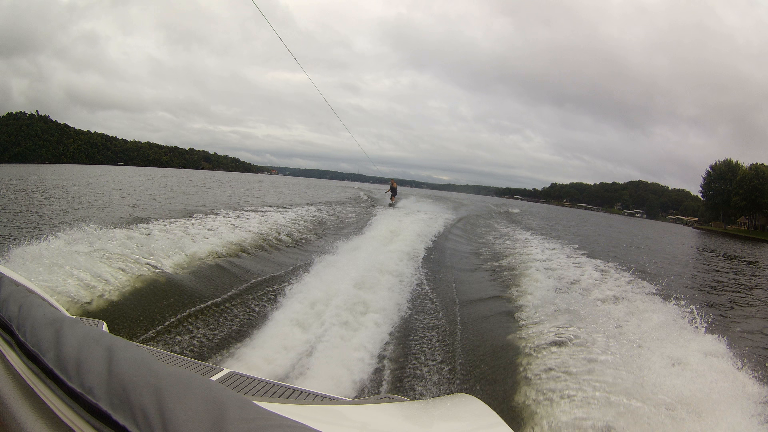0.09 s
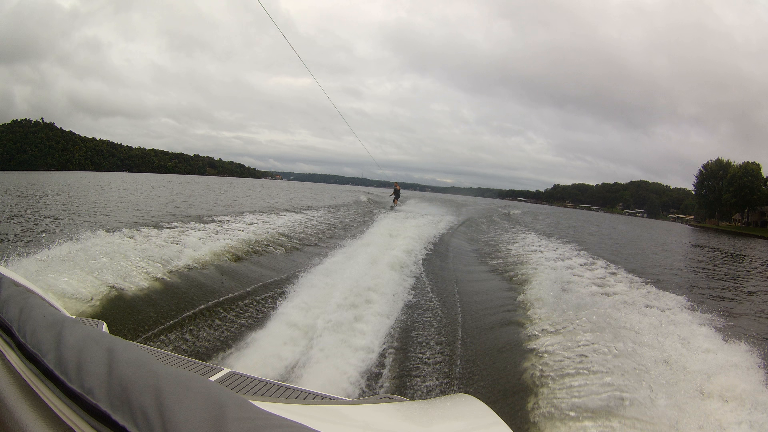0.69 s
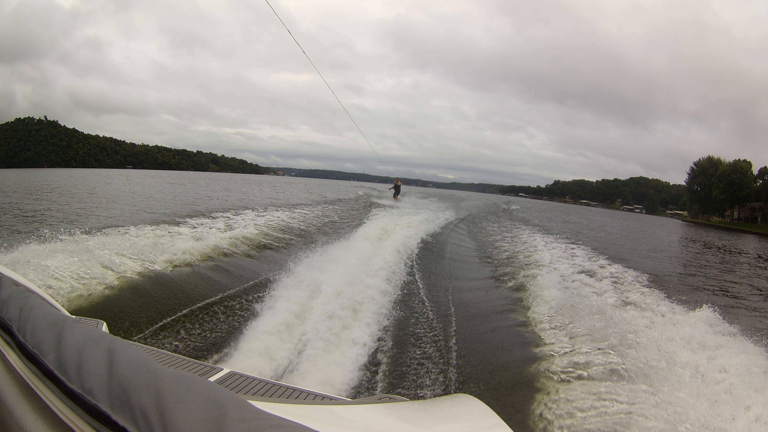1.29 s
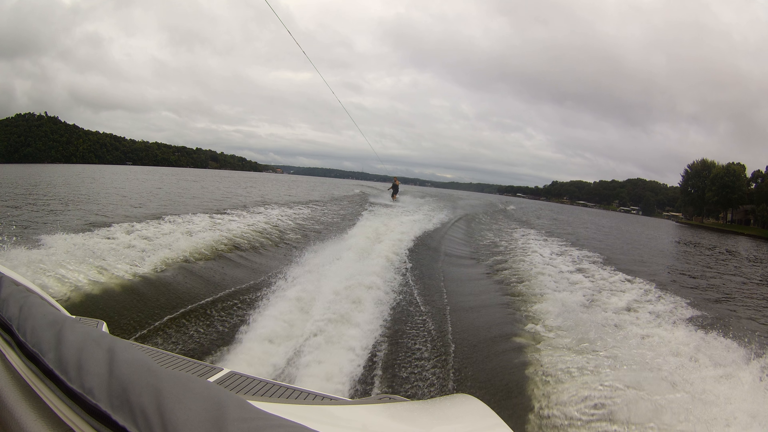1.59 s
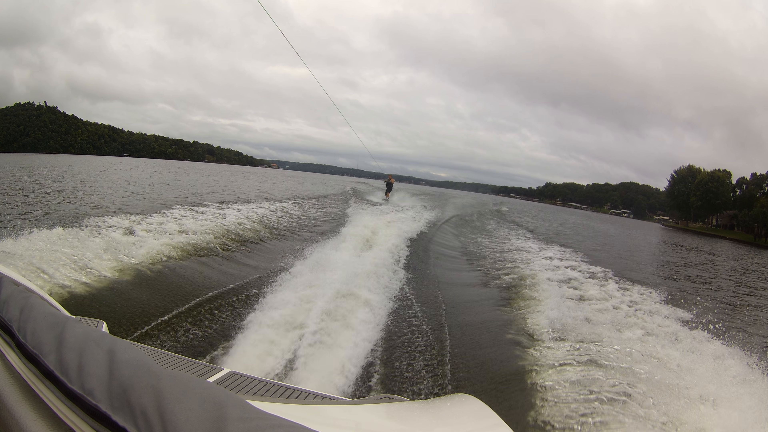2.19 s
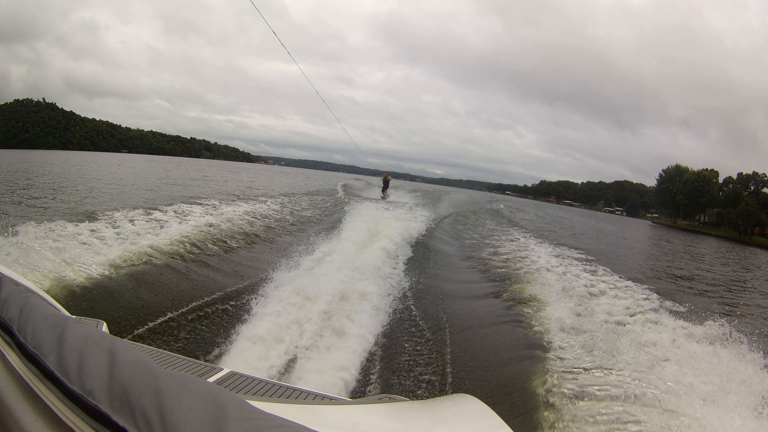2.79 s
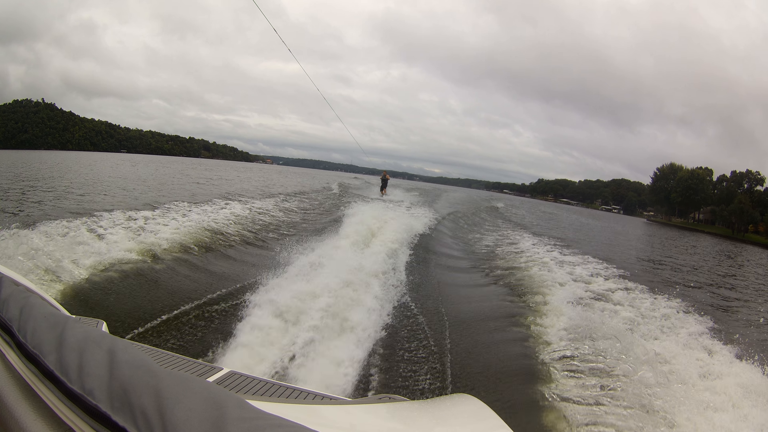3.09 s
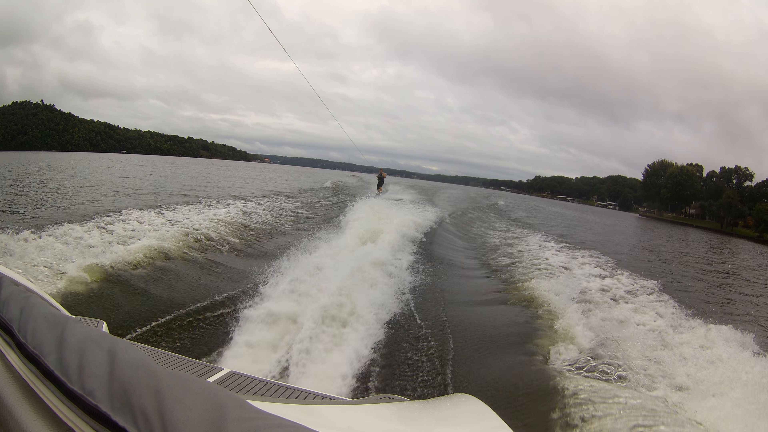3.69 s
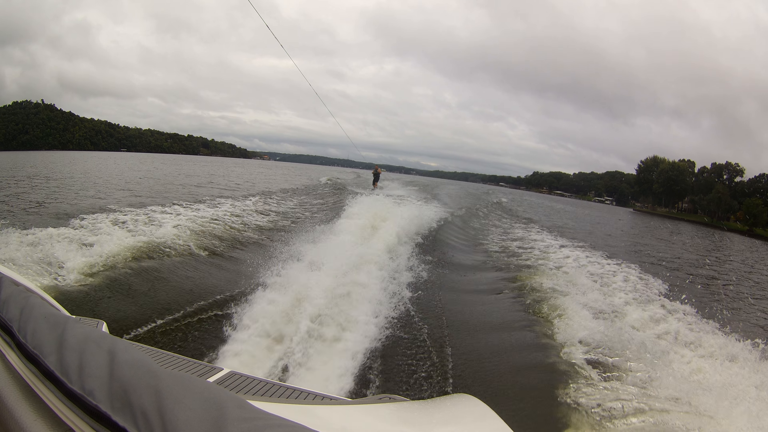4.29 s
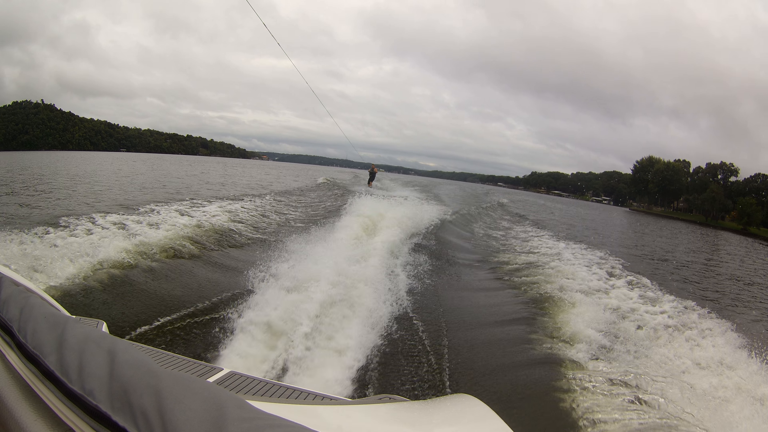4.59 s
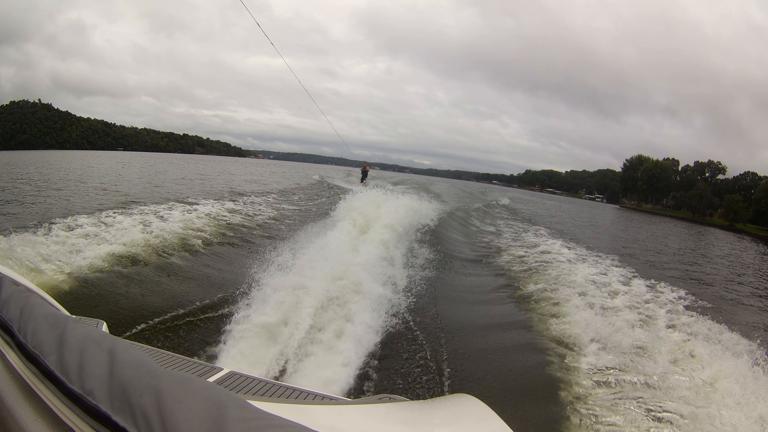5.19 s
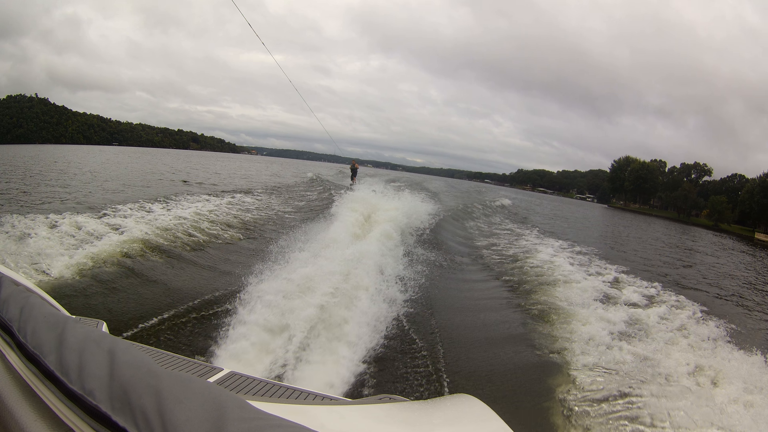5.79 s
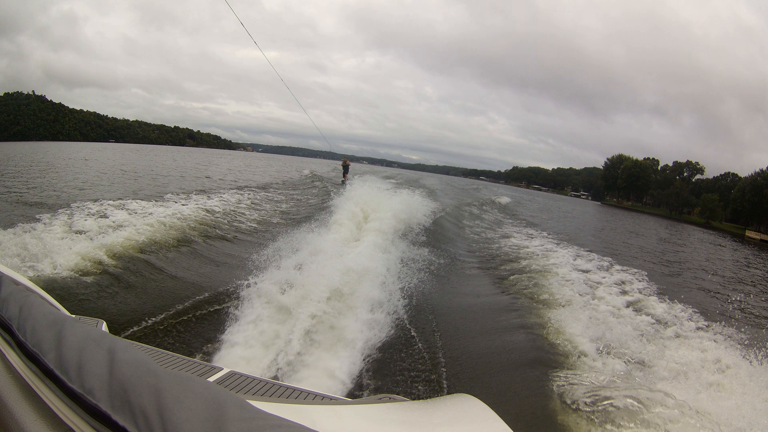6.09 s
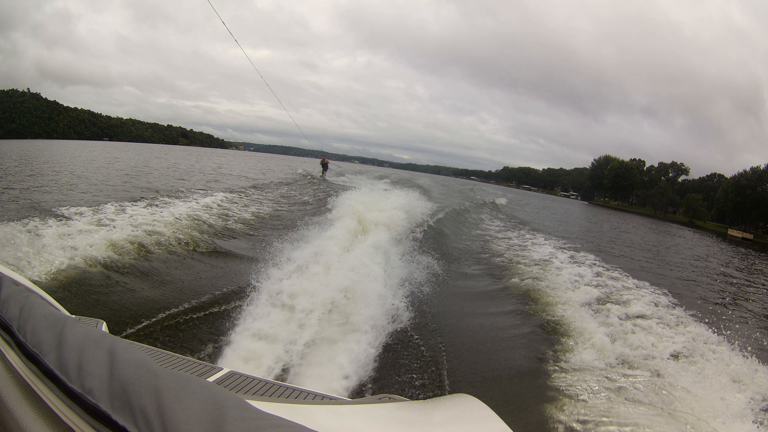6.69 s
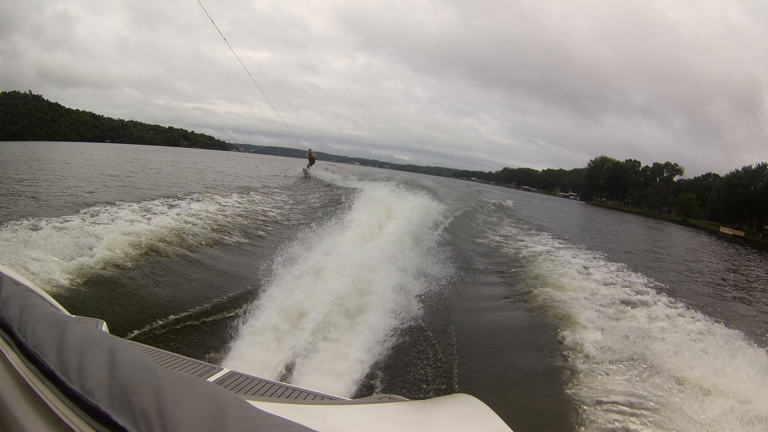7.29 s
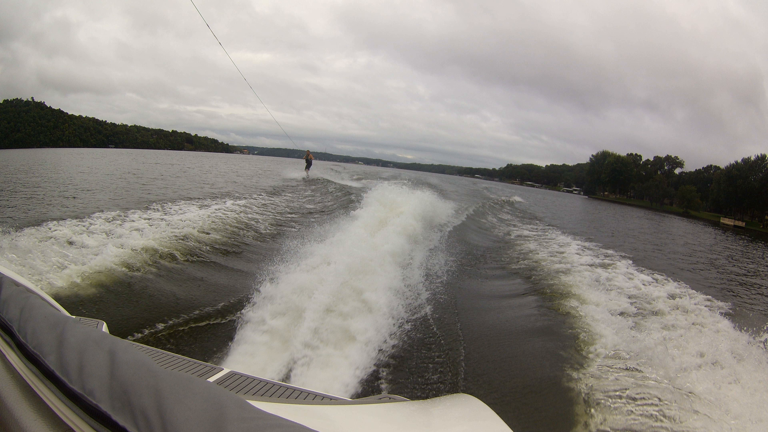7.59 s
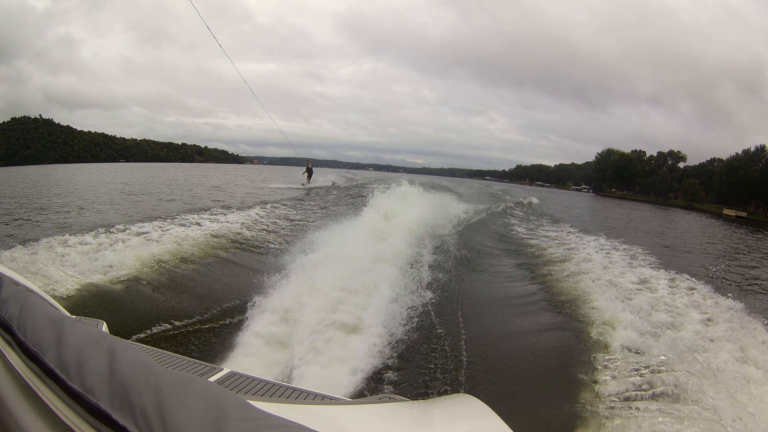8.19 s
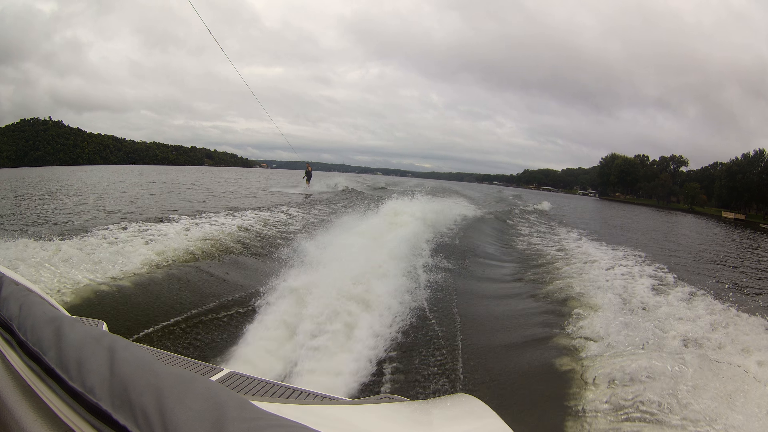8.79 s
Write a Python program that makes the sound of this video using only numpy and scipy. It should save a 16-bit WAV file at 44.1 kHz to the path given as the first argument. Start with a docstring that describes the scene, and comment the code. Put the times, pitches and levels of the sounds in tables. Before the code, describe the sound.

A ski boat runs across a lake, heard from on board facing the stern. Engine and propeller drone through the hull with a throbbing beat, over a low underwater exhaust rumble and the churning, hissing wake. Early on, water slaps lightly on the hull and a few drops tick on the microphone's case. The engine eases slightly, then climbs in pitch and grows louder along with the wash.

```python
"""Ski boat towing a rider

On board, facing the stern, the boat eases off, then gathers speed across a lake. Propeller blades and
an eight-cylinder engine drone through the hull, each tone throbbing against a close neighbour.
The exhaust rumbles under water and the wake churns and hisses, both louder with speed. The camera
mount shudders; early on, water slaps the hull and a few drops of spray tick on the camera case."""
import sys
import numpy as np
from scipy import signal
from scipy.fft import rfft, irfft
from scipy.io import wavfile
from scipy.ndimage import uniform_filter1d

SR = 44100
rng = np.random.default_rng(int(sys.argv[2]) if len(sys.argv) > 2 else 0)


def log_audio(samples):
    """Write samples as a 16-bit WAV file to the path given in sys.argv[1]."""
    # one column per channel
    frames = np.atleast_2d(samples).T
    # limit to full scale, then quantise
    limited = np.clip(frames, -1, 1)
    pcm = np.round(limited * 32767).astype(np.int16)
    wavfile.write(sys.argv[1], SR, pcm)


N = 396900


def from_db(db):
    return 10 ** (np.asarray(db) / 20)


def unit_rms(x):
    return x / np.sqrt(np.mean(x ** 2) + 1e-20)


def automation(rows):
    """One value per sample for each column after the time column."""
    times, *columns = np.transpose(rows)
    return [np.interp(np.arange(N) / SR, times, column) for column in columns]


def running_angle(hz):
    """Angle of something that turns at a changing rate, from a random start."""
    return 2 * np.pi * (np.cumsum(hz) / SR + rng.random())


def drift(rate_hz):
    """Smooth random wander with a spread of about 1."""
    hop, settle = 40, 2000
    pole = np.exp(-2 * np.pi * hop * rate_hz / SR)
    noise = rng.standard_normal(N // hop + settle + 2)
    slow = signal.lfilter([1], [1, -2 * pole, pole * pole], noise)[settle:]
    return np.interp(np.arange(N) / hop, np.arange(len(slow)), unit_rms(slow))


def coloured(x, spectrum):
    """Shapes x with a smooth EQ curve that falls away beyond both ends; rms 1."""
    hz, db = np.transpose(spectrum)
    bin_hz = np.maximum(np.arange(N // 2 + 1) * SR / N, 1)
    gain = from_db(np.interp(np.log(bin_hz), np.log(hz), db))
    roll_off = (1 + (.5 * hz[0] / bin_hz) ** 2) * (1 + (.5 * bin_hz / hz[-1]) ** 4)
    return unit_rms(irfft(rfft(x) * gain / roll_off, N))


def resonance(x, hz, width_hz):
    """Two-pole resonance with gain 1 at its peak."""
    r = np.exp(-np.pi * width_hz / SR)
    feedback = [1, -2 * r * np.cos(2 * np.pi * hz / SR), r * r]
    return signal.lfilter(np.array([1, 0, -1]) * (1 - r * r) / 2, feedback, x + 1e-18)


def band(x, hz, width_hz):
    """The same resonance twice over, for steeper skirts; rms 1."""
    return unit_rms(resonance(resonance(x, hz, width_hz), hz, width_hz))


def grains(per_s, spread_db):
    """Random clicks, many small and a few large; rms 1."""
    sizes = from_db(spread_db * np.minimum(rng.exponential(1, N), 5)) * rng.choice([-1, 1], N)
    return unit_rms(sizes * (rng.random(N) < per_s / SR))


def beating(angle, neighbour_gain, slip, lull_s):
    """A tone throbs against a neighbour off-pitch by the fraction slip, with a dip at lull_s; rms 1."""
    slipped = np.cumsum(slip * np.gradient(angle))
    slipped -= slipped[round(lull_s * SR)]
    pair = np.sin(angle) - neighbour_gain * np.sin(angle + slipped)
    return pair * np.sqrt(2 / (1 + neighbour_gain ** 2))


# Propeller shaft speed: time_s, turns_per_s
SHAFT_SPEED = [(0, 66.62), (0.5, 64.64), (1, 63.14), (1.5, 62.33), (2.4, 63.99), (2.8, 65.62), (3.4, 67.54),
               (4.1, 70.9), (4.9, 74.41), (5.6, 77.23), (6.4, 78.18), (7.1, 79.98), (8.1, 81.23), (9, 79.5)]
# Depth of the blade tone's throb: time_s, neighbour_gain
BLADE_THROB_DEPTH = [(0, 0.4), (1, 1), (2.6, 1), (3.2, 0.24), (4.6, 0), (6.2, 0.42), (9, 0.63)]
# How far the neighbour sits below the blade tone: time_s, detune_fraction
BLADE_DETUNE = [(0, .0146), (2.6, .0168), (3.2, .0146), (6.2, .016), (9, .0157)]


def propeller(hull_hz=191.7, hull_width_hz=17.7, blade_db=-15.5, hum_db=-39.5, octave_db=-55.5):
    """Three blades pound the hull, loudest at its resonance; a slight unbalance hums once per turn."""
    shaft_hz, = automation(SHAFT_SPEED)
    neighbour_gain, = automation(BLADE_THROB_DEPTH)
    slip, = automation(BLADE_DETUNE)
    shaft = running_angle(shaft_hz)
    blade = 3 * shaft + .012 * drift(12)
    off_resonance = 2 * (3 * shaft_hz - hull_hz) / hull_width_hz
    level = from_db(blade_db + drift(35)) / np.sqrt(1 + off_resonance ** 2)
    drone = level * beating(blade, neighbour_gain, -slip, lull_s=.288)
    hum = (shaft_hz / shaft_hz.mean()) ** 2 * np.sqrt(2) * np.sin(shaft)  # grows with speed squared
    return drone + from_db(hum_db) * hum + from_db(octave_db) * np.sin(2 * blade)


# Crankshaft speed, easing off and then climbing: time_s, turns_per_s
CRANK_SPEED = [(0, 44.0), (1, 41.95), (1.6, 41.75), (2.5, 42.85), (3.3, 43.9), (4, 46.2), (4.8, 49.45),
               (5.4, 50.15), (6, 51.6), (7, 52.75), (7.6, 52.95), (8.3, 54.35), (9, 54.0)]
# Level and throb of the firing tone: time_s, level_db, neighbour_gain
FIRING_TONE = [(0, -25.5, 0.4), (1, -23.5, 0.62), (3.3, -29.5, .35), (4.3, -19, 0.6), (5, -22.5, 0.52),
               (6, -21, 1), (7.2, -20.5, 0.5), (8.2, -26, 0.78), (9, -22, 0.3)]
# How far each engine tone's neighbour sits above it: time_s, detune_fraction
ENGINE_DETUNE = [(0, .0132), (2, .018), (3.5, .0136), (4.5, .0185), (6, .0163), (9, .016)]
# The engine's other tones: crank_multiple, gain_db
ENGINE_ORDERS = [(3, -2), (7, -16.5), (8, -1), (8.5, -13), (9, 0), (9.5, -13), (10, 0.5), (11, -7.5),
                 (12, -1), (13, -11.5), (14, -13), (16, -11)]
# Hull resonances that those tones sweep through: centre_hz, width_hz, gain_db
HULL_MODES = [(144, 35, 5), (331, 32, 6.5), (420.9, 55, -0.5), (481.3, 26, -4), (500.6, 26, -7.5),
              (615.5, 70, -6.5), (780, 200, -11.5)]


def engine(crank_hz, speed_db, throttle_lead_s=.35, flutter_db=1.54, rough_db=2.0, lull_s=.247):
    """Four firings per turn; other orders swell at hull resonances. Returns sound and firing angle."""
    firing_db, neighbour_gain = automation(FIRING_TONE)
    slip, = automation(ENGINE_DETUNE)
    crank = running_angle(crank_hz)
    firing = 4 * crank + .11 * drift(12)
    sound = from_db(firing_db + flutter_db * drift(18)) * beating(firing, neighbour_gain, slip, lull_s)
    # The throttle runs ahead of the speed, so the engine works harder while it accelerates.
    acceleration_db_per_s = uniform_filter1d(np.gradient(speed_db) * SR, size=SR)
    load_db = -39.5 + 6.5 * (speed_db + throttle_lead_s * acceleration_db_per_s)
    for order, gain_db in ENGINE_ORDERS:
        hull_gain = sum(from_db(db) / (1 + (2 * (order * crank_hz - hz) / width_hz) ** 2) ** 1.64
                        for hz, width_hz, db in HULL_MODES)
        angle = order * crank + .33 * drift(11)
        tone = beating(angle, neighbour_gain=.22, slip=slip, lull_s=lull_s)
        sound += hull_gain * from_db(load_db + gain_db + rough_db * drift(8)) * tone
    return sound, firing


# EQ of the underwater rumble: frequency_hz, gain_db
RUMBLE_EQ = [(18, -27.5), (40, -13), (60, -12), (95, -3.5), (130, -2), (152, 1), (195, -0.5), (220, -5),
             (258, -12.5), (300, -19.5), (400, -25.5), (700, -66)]


def exhaust(speed_db, firing, pulse_depth=.46):
    """Gas bursts into the water at each firing; the hull's main mode booms and a higher one growls."""
    gas_in_water, gas_on_hull = rng.standard_normal((2, N)) * (1 + pulse_depth * np.cos(firing))
    rumble = from_db(-27.5 + 1.1 * speed_db) * coloured(gas_in_water, RUMBLE_EQ)
    boom_db = -31.5 + 1.1 * speed_db + 21 * np.maximum(speed_db, 0)  # far harder above cruising speed
    boom = from_db(boom_db) * band(gas_on_hull, hz=197.2, width_hz=29)
    growl = from_db(-44 + 2.2 * speed_db) * band(gas_on_hull, hz=427, width_hz=110)
    return rumble + boom + growl


# EQ of the churning wash: frequency_hz, gain_db
CHURN_EQ = [(200, -7.5), (300, 0), (420, 4), (550, -2.5), (700, -1), (850, 1.5), (1150, -1.5), (1450, -6),
            (1750, -16.5), (2300, -22.5), (3500, -34), (7000, -60)]
# EQ of the hissing spray: frequency_hz, gain_db
SPRAY_EQ = [(1000, -12), (2000, -1), (3200, 0), (3900, -4), (5200, -7), (6800, -9), (8000, -18),
            (9600, -17), (11500, -20.5), (13500, -23.5), (15700, -22.5)]


def wake(speed_db, firing, bubble_q=7, bubble_gain=.5, pulse_depth=.25, surge_db=.65, flicker_db=.3):
    """Bubbles ring briefly in the rush of the wash; spray patters back on the lake."""
    pitches_hz = np.geomspace(350, 2800, 18)
    births = grains(per_s=3000, spread_db=3)
    pitch_index = rng.integers(0, len(pitches_hz), N)
    bubbles = sum(resonance(births * (pitch_index == k), hz, hz / bubble_q)
                  for k, hz in enumerate(pitches_hz))
    rush = rng.standard_normal(N) * (1 + pulse_depth * np.cos(firing))
    churn = unit_rms(coloured(rush, CHURN_EQ) + bubble_gain * coloured(bubbles, CHURN_EQ))
    spray = coloured(grains(per_s=9000, spread_db=3) + rng.standard_normal(N), SPRAY_EQ)
    churn_db = -40.5 + 1.7 * speed_db + surge_db * drift(4.3)
    spray_db = -62 + .41 * speed_db + flicker_db * drift(13)
    return from_db(churn_db) * churn + from_db(spray_db) * spray


def mount_shudder(pitch_hz=30.8, level_db=-40, swing_db=5.5):
    """The ride shakes the camera mount, which shudders at its own low resonance."""
    level = from_db(level_db + swing_db * np.tanh(drift(1.5)))
    angle = running_angle(np.full(N, pitch_hz)) + .8 * drift(2)
    return level * np.sqrt(2) * np.sin(angle)


# Gouts of water hitting the hull: start_s, strength_db
SLAP_HITS = [(0.023, -41.5), (0.805, -40.5), (0.813, -37)]


def hull_slaps(decay_s=.0083, cutoff_hz=4500, gain_db=-8):
    """A gout of water breaks up on the hull in a few milliseconds: a short, dull burst."""
    t = np.arange(N) / SR
    envelope = sum(from_db(strength_db) * (t >= start_s) * np.exp(-np.abs(t - start_s) / decay_s)
                   for start_s, strength_db in SLAP_HITS)
    splat = envelope * band(rng.standard_normal(N), hz=1500, width_hz=1700)
    return from_db(gain_db) * signal.sosfilt(signal.butter(2, cutoff_hz, fs=SR, output="sos"), splat)


# Drops landing on the case, brighter for a harder contact: start_s, strength_db, cutoff_hz
DROP_HITS = [(0.029, -30, 8200), (0.0698, -29.5, 7540), (0.2333, -34, 6500), (0.353, -34, 5500),
             (0.3983, -36, 6500), (0.7666, -30, 6510), (0.8113, -36.5, 6030), (0.8568, -33, 6500),
             (1.1093, -44.5, 6070), (1.152, -40.5, 6000), (1.2324, -41, 6000), (1.5198, -43.5, 6160),
             (3.0277, -36, 3460)]
# Modes of the case that a drop sets ringing: pitch_hz, width_hz, gain_db
TICK_MODES = [(1620, 320, 9), (2630, 430, 4.5), (3770, 290, 6), (4380, 380, -4), (5550, 440, -10),
              (6900, 600, -9), (9600, 1200, -10)]


def drop_ticks(peak_db=-25.6):
    """Each drop is one soft-edged tick into the modes of the plastic case."""
    force = np.zeros(N)
    for start_s, strength_db, cutoff_hz in DROP_HITS:
        click = from_db(strength_db) * (np.arange(N) == round(start_s * SR))
        force += signal.sosfilt(signal.butter(3, cutoff_hz, fs=SR, output="sos"), click + 1e-18)
    ticks = sum(from_db(db) * resonance(force, hz, width_hz) for hz, width_hz, db in TICK_MODES)
    return from_db(peak_db) * ticks / np.abs(ticks).max()


def scene(cruise_turns_per_s=52):
    """The mono mix; crank speed drives the engine, the exhaust and the wake."""
    crank_hz, = automation(CRANK_SPEED)
    speed_db = 20 * np.log10(crank_hz / cruise_turns_per_s)  # 0 at cruising speed
    motor, firing = engine(crank_hz, speed_db)
    machinery = propeller() + motor + exhaust(speed_db, firing)
    water = wake(speed_db, firing) + hull_slaps() + drop_ticks()
    return (machinery + water + mount_shudder())[None]


# Peaks and hollows of the closed camera case: centre_hz, width_hz, gain_db
CASE_EQ = [(820, 30, 4.5), (988, 39, -8), (1057, 65, 2), (1166, 53, 3), (1187, 43, -5), (1395, 51, -5),
           (1418, 81, 4), (1940, 64, -2), (1970, 90, 5), (2216, 81, -8.5), (2270, 52, 3.5), (2507, 90, 4),
           (2690, 250, -5.5), (3148, 400, 2), (3880, 530, -3.5), (4340, 87, 5.5), (5210, 85, 6),
           (5830, 520, -4.5), (6500, 300, 3), (8000, 1200, -8), (9800, 420, 3), (11000, 540, -2)]


def record(dry, fade_s=.002, cutoff_hz=15700):
    """A soft start and end; the closed case colours the sound; the top is cut steeply."""
    sound = dry * signal.windows.tukey(N, 2 * fade_s * SR / N)
    for hz, width_hz, gain_db in CASE_EQ:
        sound = sound + (from_db(gain_db) - 1) * resonance(sound, hz, width_hz)
    return signal.sosfilt(signal.ellip(12, .1, 80, cutoff_hz, fs=SR, output="sos"), sound)


dry = scene()
out = record(dry)
log_audio(out)
```